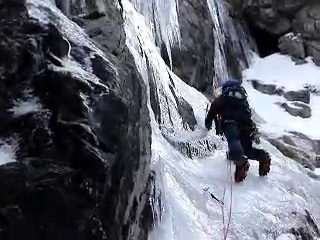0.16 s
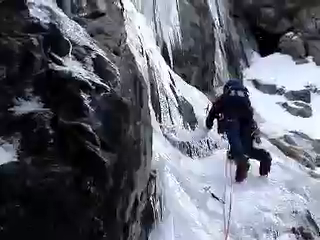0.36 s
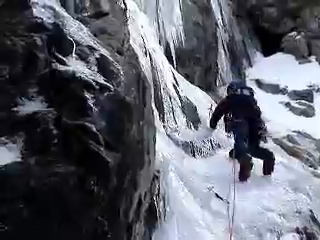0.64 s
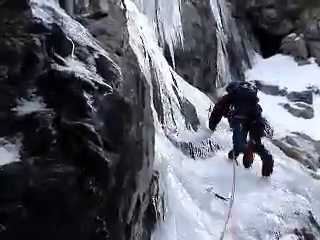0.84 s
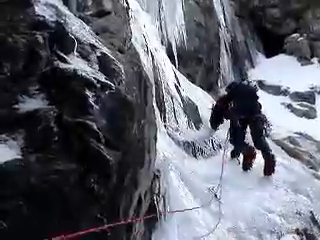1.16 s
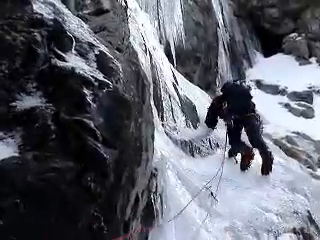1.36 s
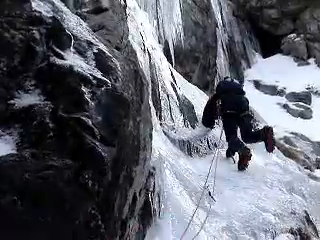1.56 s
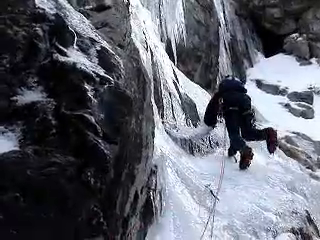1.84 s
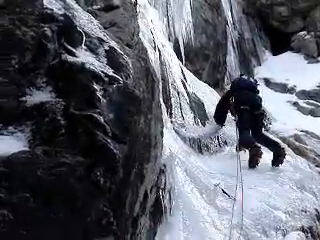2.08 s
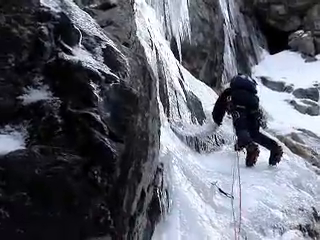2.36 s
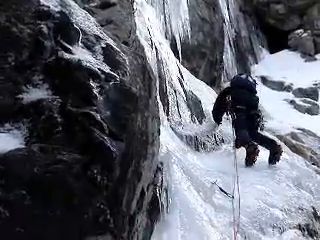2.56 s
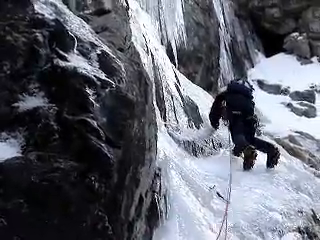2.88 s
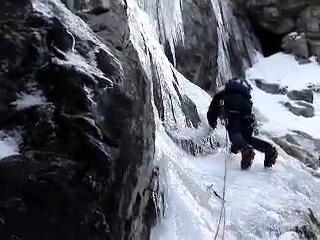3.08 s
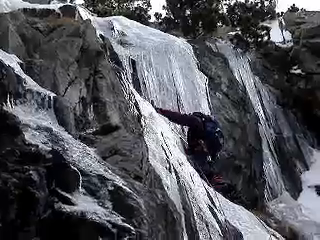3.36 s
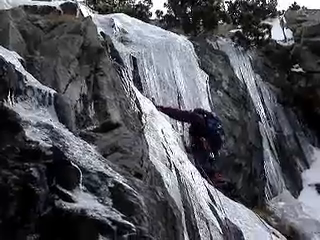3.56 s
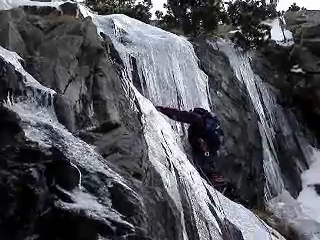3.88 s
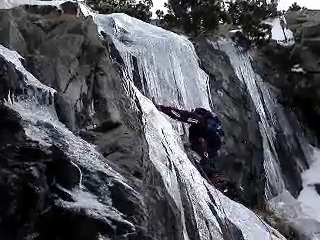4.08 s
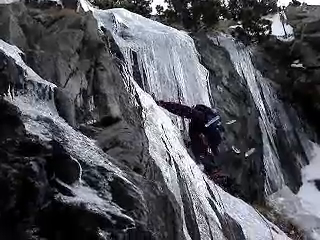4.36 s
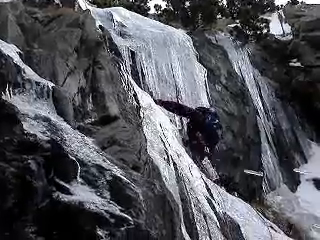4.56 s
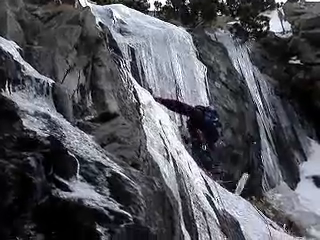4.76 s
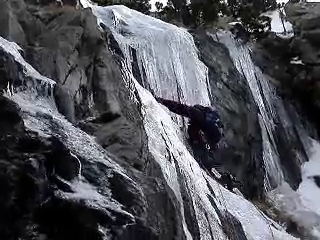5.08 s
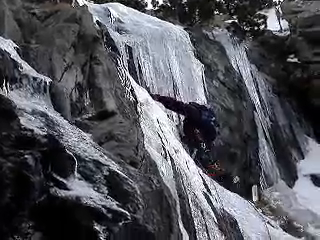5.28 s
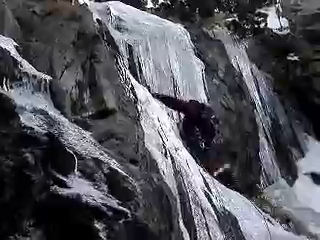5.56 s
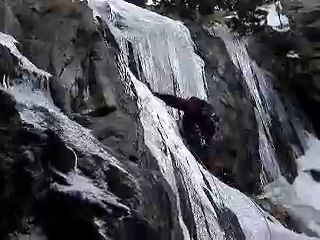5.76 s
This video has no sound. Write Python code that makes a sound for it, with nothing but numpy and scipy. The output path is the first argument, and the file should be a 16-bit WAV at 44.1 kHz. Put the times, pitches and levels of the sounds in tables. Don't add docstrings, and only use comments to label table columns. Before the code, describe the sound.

A climber's metal spikes and picks strike solid ice unevenly, with crisp cracks, short hollow thuds, gritty scrapes and light metallic ringing. Crumbs slide faintly between blows, with breathy low wind and handling knocks on a handheld microphone. After a switch click and momentary dropout, chunks and icicles shatter and land in overlapping crunches, with chattering shards and sliding debris, loudest near the end.

```python
import sys
import numpy as np
from scipy import signal
from scipy.fft import rfft, irfft
from scipy.io import wavfile
from scipy.ndimage import uniform_filter1d

SR = 44100
rng = np.random.default_rng(int(sys.argv[2]) if len(sys.argv) > 2 else 0)


def volts_from_db(level):
    exponent = np.asarray(level, float) / 20
    return 10 ** exponent


def log_audio(samples):
    frames = np.atleast_2d(samples).T
    limited = np.clip(frames, -1, 1)
    pcm = np.round(limited * 32767).astype(np.int16)
    wavfile.write(sys.argv[1], SR, pcm)


N = 261513


def rms_one(x):
    return x / np.sqrt(np.mean(x ** 2, axis=-1, keepdims=True) + 1e-20)


def add(out, start_s, sound):
    i = round(start_s * SR)
    out[i:i + len(sound)] += sound[:N - i]


def drift(rate):
    r = np.exp(-80 * np.pi * rate / SR)
    white = rng.standard_normal(N // 40 + 2002)
    slow = signal.lfilter([1], [1, -2 * r, r * r], white)[2000:]
    return np.interp(np.arange(N) / 40, np.arange(len(slow)), rms_one(slow))


def band(x, low_hz, high_hz, order=2):
    return signal.sosfilt(signal.butter(order, [low_hz, high_hz], "band", fs=SR, output="sos"), x)


def coloured(x, spectrum):
    hz, level_db = np.transpose(spectrum)
    grid = np.fft.rfftfreq(x.shape[-1], 1 / SR) + 1
    gain = volts_from_db(np.interp(np.log(grid), np.log(hz), level_db))
    return irfft(rfft(x) * gain, x.shape[-1])


def split(x, edges_hz):
    spectrum, hz = rfft(x), np.fft.rfftfreq(x.shape[-1], 1 / SR) + 1
    above = [1] + [1 / (1 + (edge / hz) ** 6) for edge in edges_hz] + [0]
    return [rms_one(irfft(spectrum * (a - b), x.shape[-1])) for a, b in zip(above, above[1:])]


def resonate(x, hz, t60):
    r, w = volts_from_db(-60 / (t60 * SR)), 2 * np.pi * hz / SR
    return signal.lfilter([0, np.sin(w)], [1, -2 * r * np.cos(w), r * r], x)


def grains(shape, spread_db, share):
    sizes = volts_from_db(spread_db * np.minimum(rng.exponential(1, shape), 3.0))
    clicks = sizes * (rng.random(shape) < share)
    return rms_one(rng.standard_normal(shape) * (1 + clicks))


def shard_colour(x, peaky_db, width_hz):
    spectrum = rfft(x)
    bins = max(round(width_hz * x.shape[-1] / SR), 2)
    white = rng.standard_normal(spectrum.shape)
    bumps = rms_one(uniform_filter1d(uniform_filter1d(white, bins), bins))
    return irfft(spectrum * volts_from_db(peaky_db * bumps), x.shape[-1])


# (frequency [Hz], level [dB per Hz])
CRUNCH_COLOUR = [(110, -33.5), (200, -16), (400, -6), (760, -4), (1200, -4), (4000, -5.5), (8000, -15),
                 (10300, -20)]
# (pitch [Hz], level [dB], ring time t60 [s])
SLAB_NOTES = [
    (162, -3, 0.0625),
    (361, -1, 0.0314),
]


def breaking_ice(table, body_db, edge_db, edge_follows, crack_db, tail_t60, tail_db, body_t60, slab_db):
    out, t = np.zeros(N), np.arange(SR // 2) / SR
    grit = coloured(grains((len(table), len(t)), spread_db=3.5, share=.04), CRUNCH_COLOUR)
    grit = shard_colour(grit, peaky_db=3.0, width_hz=150)
    ranges = np.stack(split(grit, [550, 1500, 5000]), axis=1)
    spurts = rms_one(band(rng.standard_normal((len(table), len(t))), 61, 143))
    for (s, db, knock_db, length), (body, hollow, middle, top), spurt in zip(table, ranges, spurts):
        hold = np.exp(-(t / max(length, .003)) ** 3) + volts_from_db(tail_db - 60 * t / tail_t60)
        crack = volts_from_db(crack_db) * np.exp(-t / 0.00444)
        shape = (hold * volts_from_db(1.93 * spurt) + crack) * np.minimum(t / 0.00165, 1)
        thud = (1 - np.exp(-t / 0.0058)) * (hold + volts_from_db(-9.5 - 60 * t / body_t60))
        slab = sum(volts_from_db(g) * rms_one(resonate(body, hz, t60)) for hz, g, t60 in SLAB_NOTES)
        body = rms_one(body + volts_from_db(slab_db) * slab)
        top_db = edge_db + edge_follows * db
        bright = volts_from_db(db - 20) * middle + volts_from_db(knock_db - 11) * hollow + volts_from_db(top_db - 5.5) * top
        add(out, s - .001, shape * bright + volts_from_db(knock_db + body_db - 7) * thud * body)
    return out


def struck_ice(table, body_db, edge_db, edge_follows):
    return breaking_ice(table, body_db, edge_db, edge_follows, crack_db=1.5, tail_t60=0.739, tail_db=-6.5,
                        body_t60=0.458, slab_db=-3)


def fallen_ice(table, body_db, edge_db, edge_follows):
    pieces = breaking_ice(table, body_db, edge_db, edge_follows, crack_db=-7.5, tail_t60=0.42, tail_db=-12.5,
                          body_t60=0.125, slab_db=-15.5)
    return band(pieces, 120, 20000)


# (time [s], crunch peak [dB], knock [dB], crunch length [s])
BOOT_KICKS = [(.153, -2.5, -14, 0.0419), (.233, -14.5, -21, 0.0303), (.643, -29, -47, 0.0205),
              (.778, -26.5, -45.5, 0.047), (.883, -23.5, -32, 0.047), (1.265, -13, -26, .043),
              (1.341, -29, -38, 0.034), (1.51, -21, -38, 0.0614), (2.021, -7, -23, 0.0366),
              (2.209, -23, -36, 0.035), (2.369, -18, -41.5, 0.0395)]


def boot_kicks():
    return struck_ice(BOOT_KICKS, body_db=1.5, edge_db=-18, edge_follows=0.821)


# (time [s], crunch peak [dB], knock [dB], crunch length [s])
PICK_BLOWS = [
    (1.99, -17, -29.5, 0.038),
    (2.41, -19, -33.5, 0.0328),
    (2.508, -36, -45.5, 0.08),
    (2.545, -31, -31, .03),
    (2.683, -16, -26, 0.0422),
    (2.766, -24.5, -33.5, 0.032),
    (2.916, -25.5, -51.5, 0.037),
    (2.945, -42, -57, .021),
    (3.041, -21, -35, .024),
]


def pick_blows():
    return struck_ice(PICK_BLOWS, body_db=-20.5, edge_db=-18, edge_follows=0.995)


# (time [s], crunch peak [dB], knock [dB], crunch length [s])
SPIKE_SCRATCHES = [
    (.548, -27.5, -57, 0.061),
    (1.117, -29, -35, 0.0414),
    (1.604, -25, -42, 0.045),
    (1.738, -50, -40, .01),
    (1.785, -25, -42.5, 0.0182),
    (1.941, -34, -52, 0.031),
    (2.228, -18, -28.5, 0.0446),
    (2.567, -21, -48, 0.0119),
    (3.013, -34.5, -35, 0.031),
]


def spike_scratches():
    return struck_ice(SPIKE_SCRATCHES, body_db=-18, edge_db=-11, edge_follows=0.816)


# (time [s], crunch peak [dB], knock [dB], crunch length [s])
HEAVY_BLOCKS = [(3.541, -18.5, -36, 0.064), (3.615, -34, -30, 0.0335), (3.742, -13, -31, 0.072),
                (3.859, -28, -15.5, .024), (3.937, -32, -21.5, 0.0604), (3.966, -14.5, -27.5, 0.059),
                (4.04, -4.5, -24, 0.065), (4.096, -6.5, -23.5, 0.049), (4.412, -25.5, -22, 0.0473),
                (4.462, -15.5, -35, 0.11), (4.88, -5, -23, 0.1), (4.989, -27, -20.5, 0.0248),
                (5.006, -14.5, -28.5, 0.0153), (5.037, -8, -25, 0.07), (5.059, -2, -18, 0.072),
                (5.179, 2.5, -12, .038), (5.423, -8, -24.5, 0.0323), (5.522, -18.5, -24, 0.0182),
                (5.822, -7.5, -26.5, 0.0383)]


def heavy_blocks():
    return fallen_ice(HEAVY_BLOCKS, body_db=-1.5, edge_db=-22, edge_follows=.6)


# (time [s], crunch peak [dB], knock [dB], crunch length [s])
CRUMBLING_LUMPS = [(5.147, -6, -19, .04), (3.18, -18.5, -40, .062), (3.205, -10.5, -43.5, 0.053),
                   (3.331, -4.5, -16.5, 0.0542), (3.56, -9.5, -21.5, 0.0454), (3.727, -2, -20, 0.0188),
                   (3.801, -9, -26.5, 0.034), (4.248, -13.5, -21, 0.0653), (4.606, -13.5, -24, 0.012),
                   (4.641, -9, -32.5, 0.039), (4.695, -7, -15.5, 0.061), (4.759, -11, -19.5, 0.119),
                   (4.801, 1, -13.5, 0.0372), (5.5, -15.5, -20, 0.0335), (5.549, -19, -19, 0.0128),
                   (5.57, -4.5, -24, 0.023), (5.602, 4, -4.5, .038)]


def crumbling_lumps():
    return fallen_ice(CRUMBLING_LUMPS, body_db=-20, edge_db=-23, edge_follows=1.21)


# (time [s], crunch peak [dB], knock [dB], crunch length [s])
BURSTING_ICICLES = [(4.544, -12.5, -30, .045), (3.411, -17, -23, 0.0524), (3.479, -19, -30, 0.0336),
                    (3.634, -10.5, -19, 0.0388), (4.129, -6.5, -16.5, 0.0923),
                    (4.338, -29.5, -17.5, 0.0503), (4.387, -18, -26.5, 0.045), (4.481, -9.5, -19, 0.0394),
                    (4.664, -20.5, -20.5, 0.036), (4.86, -15.5, -48, 0.029), (5.078, -13, -13.5, 0.019),
                    (5.237, 0, -8, 0.0417), (5.256, 1, -18.5, 0.0526), (5.336, -1, -16, 0.0643),
                    (5.675, -9, -15, 0.086), (5.7, 4, -13, 0.0488), (5.798, -22.5, -16, 0.0374),
                    (5.87, -21.5, -36, .032)]


def bursting_icicles():
    return fallen_ice(BURSTING_ICICLES, body_db=-15.5, edge_db=-17, edge_follows=0.595)


# (time [s], peak [dB], pitch [Hz])
FRACTURES = [(.1572, -5, 3000), (.1752, -4, 3000), (1.2685, -18, 1600), (1.2835, -18, 1500),
             (1.3375, -25, 1500), (1.5135, -22, 1500), (1.7388, -22, 750), (1.8715, -28, 1460),
             (1.9908, -15, 1300), (2.0295, -11, 3270), (2.032, -15, 330), (2.1878, -25, 5400),
             (2.2489, -20, 3800), (2.2628, -21, 5900), (2.4667, -29, 2150), (2.6477, -26, 3200),
             (2.9464, -26, 3960), (3.0447, -25, 1720), (3.2001, -18, 2900), (3.3315, -17, 1400),
             (3.343, -14, 650), (3.5629, -16, 1980), (3.6733, -17, 5900), (3.729, -10, 2400),
             (4.053, -12, 2000), (4.099, -14, 2670), (4.1297, -11, 2150), (4.4643, -18, 1980),
             (4.5457, -15, 4200), (4.5615, -17, 6900), (4.6067, -15, 1640), (4.7602, -13, 2070),
             (4.8077, -6, 2670), (4.8617, -12, 4400), (4.9495, -11, 4560), (5.0604, -11, 1720),
             (5.0632, -5, 1300), (5.0788, -8, 1640), (5.1666, -8, 1550), (5.1685, -9, 900),
             (5.1795, -7, 3700), (5.2381, -3, 1120), (5.2571, -2, 2500), (5.2978, -10, 5900),
             (5.4143, -13, 4740), (5.6075, -2, 1000), (5.621, -11, 1800), (5.6444, -10, 1380),
             (5.6978, -3, 3200), (5.703, -7, 2500), (5.7717, -14, 4050), (5.7989, -13, 2400),
             (5.892, -15, 4200)]


def cracks():
    out, t = np.zeros(N), np.arange(SR // 40) / SR
    for s, db, hz in FRACTURES:
        fade = np.exp(-t * hz / .8)
        add(out, s - .25 / hz, -volts_from_db(db + 7.5) * np.sin(2 * np.pi * hz * t) * fade)
    return band(out, 380, 16000)


# (time [s], peak [dB], pitch [Hz], ring time t60 [s])
POINT_AND_SHARD_TICKS = [(0.546, -15.5, 4440, 0.017), (0.776, -17.5, 3470, 0.0176), (1.272, -17, 330, 0.06),
                         (1.512, -16.5, 334, 0.025), (1.602, -18.5, 5560, 0.013), (1.7385, -21, 721, 0.023),
                         (1.783, -13, 5030, 0.013), (2.368, -27.5, 2800, 0.015), (2.565, -11.5, 4470, 0.01),
                         (2.684, -15.5, 2097, 0.014), (3.727, -7.5, 3160, 0.019), (3.744, -4, 3116, 0.014),
                         (4.387, -8, 3010, 0.015), (4.645, -14, 3000, 0.0158), (5.061, -3.5, 534, 0.021),
                         (5.24, -9, 4030, 0.0176), (5.551, -4.5, 3970, 0.0155), (5.602, 4, 825, 0.02),
                         (5.698, 3, 3000, 0.01),
                         (1.9908, -16, 1930, .012),
    (2.2305, -13, 5500, .01),
    (3.1998, -6, 3000, .008),
    (4.6975, -8, 1600, .012),
]
# (time [s], peak [dB], pitch [Hz], ring time t60 [s])
SWITCH_CLICKS = [
    (3.076, -16.5, 1723, 0.0204),
    (3.078, -14, 1918, .025),
    (3.096, -14, 1790, 0.023),
    (3.1138, 4, 4450, 0.0018),
    (3.116, -9.5, 2293, 0.023),
    (3.119, -7, 1854, 0.0244),
    (3.121, -8, 3450, 0.0192),
    (3.1265, -8.5, 1790, .02),
]


def ticks():
    out, t = np.zeros(N), np.arange(SR // 8) / SR
    table = POINT_AND_SHARD_TICKS + SWITCH_CLICKS
    for (s, db, hz, t60), noise in zip(table, rng.standard_normal((len(table), len(t)))):
        contact = (t == 0) * np.sign(noise[0]) + 0.241 * noise * np.exp(-t / 0.00072)
        snap = band(contact, hz / 1.446, min(hz * 2.0, 10000))
        ring = resonate(contact, hz, np.clip(t60, .002, .1))
        tick = volts_from_db(-2) * ring / np.abs(ring).max() + snap / np.abs(snap).max()
        add(out, s, volts_from_db(db - 4) * tick)
    return band(out, 160, 20000)


def rattle(table):
    out, t = np.zeros(N), np.arange(SR // 3) / SR
    touches = grains((len(table), len(t)), spread_db=5.0, share=.004)
    for (s, db, hz, t60), touch in zip(table, touches):
        ring_t60 = .33 / np.sqrt(hz)
        ring = resonate(resonate(touch, hz, ring_t60), hz, ring_t60)
        add(out, s, volts_from_db(db - 60 * t / t60) * rms_one(ring))
    return band(out, 250, 20000)


# (time [s], level [dB], pitch [Hz], fade time t60 [s])
MORE_RINGING_PIECES = [(.154, -20, 3000, .06), (.157, -18, 4800, .06), (.17, -19, 4700, .1), (.183, -25, 6200, .08),
                       (1.79, -35, 5200, .08), (2.023, -22, 2700, .07), (2.042, -28, 1620, .08),
                       (3.339, -24, 3300, .1), (3.348, -18, 1350, .08), (3.418, -24, 620, .15),
                       (3.482, -25, 1400, .1), (3.727, -22, 2300, .04), (4.1, -29, 470, .5),
                       (4.128, -20, 2150, .25), (4.255, -28, 520, .2), (4.712, -25, 900, .08),
                       (4.8, -17, 1300, .04), (4.805, -17, 2850, .08), (4.82, -19, 2200, .08),
                       (4.905, -22, 500, .1), (5.077, -18, 1900, .08), (5.144, -20, 2510, .05),
                       (5.179, -17, 3950, .06), (5.19, -26, 9000, .25), (5.249, -17, 4100, .08),
                       (5.703, -21, 800, .25)]


def more_clinks():
    return volts_from_db(4) * rattle(MORE_RINGING_PIECES)


# (time [s], level [dB], pitch [Hz], fade time t60 [s])
RINGING_PIECES = [(1.762, -31.5, 5290, 0.049), (1.815, -36.5, 5170, 0.065), (1.85, -37.5, 5320, 0.206),
                  (1.962, -27.5, 5173, 0.144), (2.07, -26, 5090, 0.116), (2.136, -23, 9420, 0.0206),
                  (2.146, -15, 9870, 0.0172), (2.156, -22, 9870, 0.017), (2.515, -35, 9600, 0.0284),
                  (2.54, -47.5, 9800, 0.02), (2.511, -33, 4170, 0.132), (2.684, -24.5, 2290, 0.174),
                  (3.338, -13, 630, 0.16), (3.331, -20, 1400, 0.05), (3.41, -22, 2393, 0.138),
                  (3.48, -18.5, 2402, 0.116), (3.488, -21, 3520, 0.16), (3.635, -20, 3210, 0.136),
                  (3.741, -21.5, 3036, 0.154), (3.86, -31, 3440, 0.87), (3.86, -27.5, 5220, 0.075),
                  (3.965, -18, 781, 0.123), (4.039, -18, 2248, 0.278), (4.12, -20, 1265, 0.365),
                  (4.86, -21.5, 4440, 0.565), (5.18, -11.5, 3622, 0.24), (5.605, -9, 778, 0.187),
                  (5.702, -11, 3996, 0.144)]


def clinks():
    return rattle(RINGING_PIECES)


# (time [s], level [dB], fade time t60 [s])
ROLLING_RUBBLE = [
    (.2, -35, 1.6),
    (1.78, -43, .9),
    (2.86, -46, .9),
    (2.04, -40, 1.3),
    (3.5, -41, 3.0),
    (4.52, -38, 3.0),
    (5.05, -36, 2.0),
]


def rubble():
    t = np.arange(N) / SR
    return sum((t > s) * volts_from_db(db - 60 * np.abs(t - s) / t60) for s, db, t60 in ROLLING_RUBBLE)


# (time [s], level [dB])
DEBRIS_FLOW = [(0.0, -42.5), (.3, -50.5), (.6, -47), (.8, -41.5), (1.08, -48), (1.5, -47.5), (2.07, -38),
               (2.5, -46), (2.85, -41), (3.11, -47.5), (3.17, -33.5), (4.07, -30), (4.48, -34.5),
               (4.85, -27), (5.08, -29), (5.23, -20.5), (5.38, -27.5), (5.93, -27)]


def flow_db():
    s, level_db = np.transpose(DEBRIS_FLOW)
    return np.interp(np.arange(N) / SR, s, level_db)


def tinkle(per_s, cycles, level_db):
    sizes = volts_from_db(1.6 * np.minimum(rng.exponential(1, N), 3))
    strikes = (rng.random(N) < per_s / SR) * sizes + 1e-18
    pitches, dealt = np.geomspace(500, 9000, 30), rng.integers(0, 30, N)
    rings = sum(resonate(strikes * (dealt == k), hz, cycles / np.sqrt(hz)) for k, hz in enumerate(pitches))
    return volts_from_db(flow_db() + level_db) * rms_one(rings)


# (frequency [Hz], level [dB per Hz])
HISS_COLOUR = [(60, -52.5), (100, -23.5), (450, -12), (700, -5.5), (1200, -3.5), (3300, -4.5), (7500, -11),
               (10300, -17)]


def slide():
    middle_db = flow_db()
    swing_db = middle_db + 40
    coarse = volts_from_db(-51.5 + .55 * swing_db) + rubble()
    fine = volts_from_db(-38 + 0.876 * swing_db)
    ranges = split(coloured(grains(N, spread_db=3.0, share=.02), HISS_COLOUR), [600, 4000])
    together = 1.27 * drift(9.5)
    gains = [coarse, volts_from_db(middle_db), fine]
    return sum(part * gain * volts_from_db(together + 1.653 * drift(36.5)) for part, gain in zip(ranges, gains))


# (time [s], peak [dB], pitch [Hz])
HOUSING_KNOCKS = [(0.147, -25.5, 43.1), (0.839, -22.5, 80), (1.039, -37, 48), (1.155, -36, 55),
                  (1.229, -34.5, 48.4), (1.715, -32, 65), (1.329, -38.5, 130), (1.379, -32.5, 72.7),
                  (1.585, -18, 80), (1.622, -15, 105), (1.755, -20.5, 70), (1.807, -22, 61.5),
                  (1.875, -29, 100), (3.113, -18, 100), (3.765, -19, 190), (4.858, -19, 110),
                  (5.058, -21, 120), (5.257, -12.5, 92), (5.348, -20, 90), (5.6, -17, 100),
                  (5.609, -23, 32.5), (5.697, -17, 90), (5.705, -24, 31.8)]


def housing_knocks():
    out, t = np.zeros(N), np.arange(SR // 5) / SR
    for s, db, hz in HOUSING_KNOCKS:
        add(out, s, volts_from_db(db - 6) * np.sin(2 * np.pi * hz * t) * np.exp(-t * hz / 0.95))
    return out


# (peak time [s], peak [dB], time to fall 20 dB [s])
WIND_GUSTS = [(.01, -59, 0.46), (.18, -40.5, 0.3641), (.85, -43, 0.0942), (1.05, -49, 0.08),
              (1.22, -51, 0.13), (1.33, -37, .06), (1.4, -32.5, .07), (.5, -53, .12), (1.61, -42.5, 0.0455),
              (1.77, -40.5, 0.0835), (2.05, -35, .08), (2.13, -54, 0.13), (2.42, -52, 0.2),
              (2.62, -52, .08), (3.36, -58, .3), (3.7, -52, .3), (4.1, -62, .4), (4.5, -58, .3),
              (4.9, -50, .05), (5.0, -48, .05), (5.08, -48, .06), (5.27, -39, .06), (5.37, -46, 0.08),
              (5.63, -50, .06), (5.72, -47, 0.0146)]


def gusts():
    late = np.arange(N) / SR - np.array(WIND_GUSTS)[:, :1]
    falls = np.maximum(late, -late / 0.763)
    still_air = volts_from_db(-72)
    return still_air + sum(volts_from_db(db - 20 * fall / fall_s) for (s, db, fall_s), fall in zip(WIND_GUSTS, falls))


def wind():
    rumble = rms_one(band(rng.standard_normal(N), 23.2, 157.5))
    return rumble * gusts() * volts_from_db(-2 + 5.1 * drift(36))


def scene():
    blows = boot_kicks() + pick_blows() + spike_scratches()
    falling = heavy_blocks() + crumbling_lumps() + bursting_icicles()
    details = cracks() + ticks() + more_clinks() + clinks()
    debris = tinkle(per_s=150, cycles=3.1, level_db=-12.5) + slide()
    mid = blows + falling + details + debris + housing_knocks() + wind()
    late = np.roll(mid, 90)
    side = volts_from_db(-39 + 8.0 * drift(5.22)) * band(late, 2620, 16000)
    side = side + volts_from_db(-23 + 9.0 * drift(12)) * band(late, 12000, 15500, order=4)
    return mid + side * [[1], [-1]]


def thin_treble(x, quiet_db, rise_db, masked_db, thin_db, chance_db):
    edges_hz = np.arange(4200, 16300, 750)
    hz, frame_s, frames = signal.stft(x, SR, "cosine", nperseg=1536, noverlap=768)
    white = rng.standard_normal((len(edges_hz), len(frame_s)))
    luck = rms_one(uniform_filter1d(white, size=2, axis=0))
    for low, high, chance in zip(edges_hz, edges_hz[1:], chance_db * luck):
        inside = (hz >= low) & (hz < high)
        power = np.mean(np.abs(frames[:, inside]) ** 2, axis=(0, 1))
        level = 10 * np.log10(power + 1e-20) + chance
        below = level - uniform_filter1d(level, size=7)
        threshold = quiet_db + rise_db * (low - 12450) / 1000 + 5 * (low > 14500)
        heard = level + .8 * chance > threshold
        frames[:, inside] *= np.where(below < masked_db, volts_from_db(thin_db), 1) * heard
    frames[:, hz >= edges_hz[-1]] = 0
    return signal.istft(frames, SR, "cosine", nperseg=1536, noverlap=768)[1][:, :N]


# (start [s], end [s], depth [dB], from [Hz], to [Hz])
TREBLE_GAPS = [(0.126, 0.149, -41, 800, 18000), (.208, .23, -12, 5200, 6800),
               (0.311, 0.322, -20, 5500, 18000), (0.519, 0.541, -10.5, 3800, 18000),
               (1.248, 1.26, -25.5, 3130, 18000), (1.997, 2.03, -7.5, 5500, 18000),
               (2.0, 2.015, -12, 2800, 4300), (3.83, 3.855, -12, 4900, 5600),
               (4.518, 4.532, -8.5, 4540, 18000), (5.02, 5.038, -12, 5300, 7200),
               (5.16, 5.165, -12, 3000, 8000), (5.659, 5.671, -10, 3600, 9500),
               (5.672, 5.695, -14, 4200, 6200), (5.915, 5.927, -10, 4100, 18000)]


def blank_treble(x):
    t = np.arange(N) / SR
    for start, end, depth_db, low_hz, high_hz in TREBLE_GAPS:
        near = slice(round(start * SR) - 900, round(end * SR) + 900)
        inside = uniform_filter1d(1. * ((t[near] > start) & (t[near] < end)), size=90)
        bandpass = signal.butter(4, [low_hz, high_hz], "band", fs=SR, output="sos")
        high = signal.sosfiltfilt(bandpass, x[:, near])
        x[:, near] -= high * inside * (1 - volts_from_db(depth_db))
    return x


def top_cut(x):
    return signal.sosfilt(signal.butter(12, 15350, fs=SR, output="sos"), x)


def record(dry):
    t = np.arange(N) / SR
    top = signal.sosfiltfilt(signal.butter(10, 10000, "high", fs=SR, output="sos"), dry)
    x = 0.9854 * np.tanh((dry - top * (1 - volts_from_db(-8.5))) / 1.462)
    x = thin_treble(x, quiet_db=-83.5, rise_db=10, masked_db=-5.5, thin_db=-14, chance_db=3.0)
    x = blank_treble(x)
    silence = np.where((t > 3.1275) & (t < 3.167), volts_from_db(-120), 1)
    mix = x * uniform_filter1d(silence, size=40)
    return top_cut(mix)


dry = scene()
out = record(dry)
log_audio(out)
```